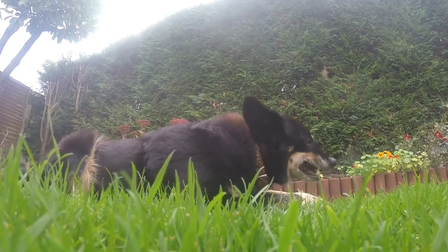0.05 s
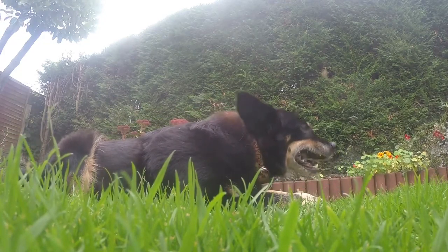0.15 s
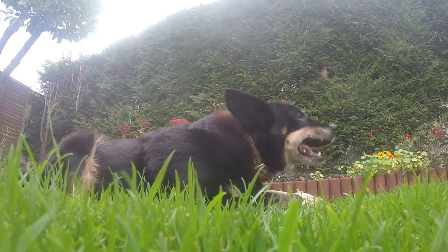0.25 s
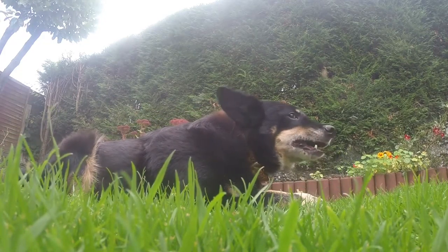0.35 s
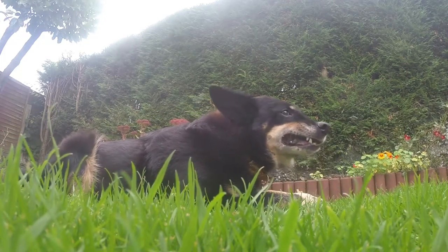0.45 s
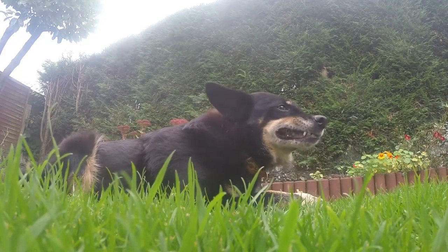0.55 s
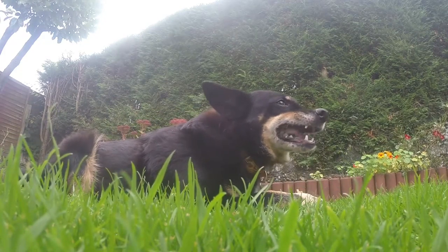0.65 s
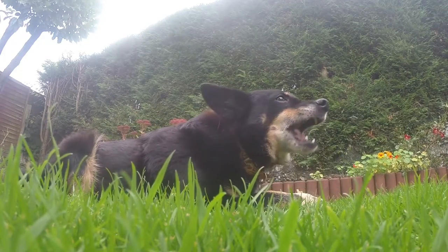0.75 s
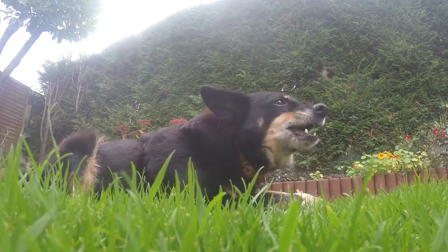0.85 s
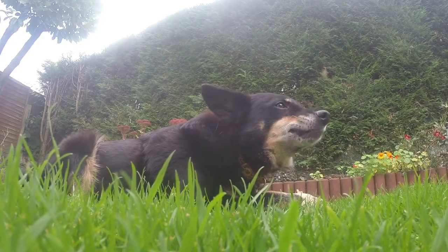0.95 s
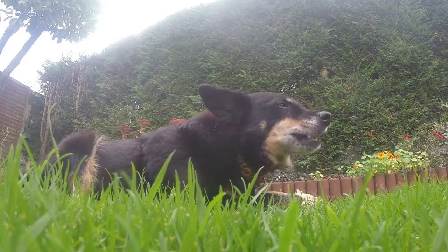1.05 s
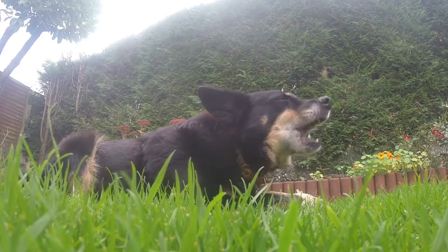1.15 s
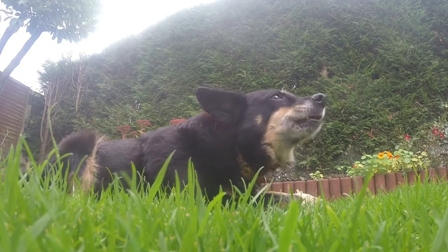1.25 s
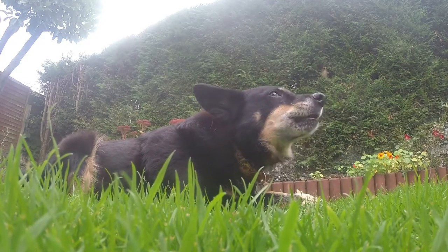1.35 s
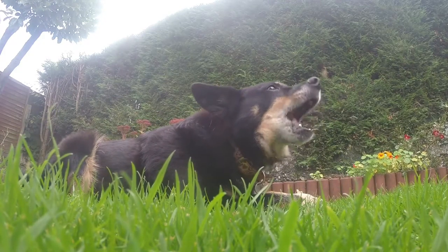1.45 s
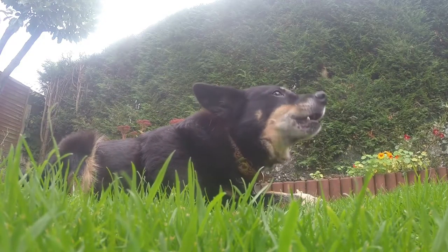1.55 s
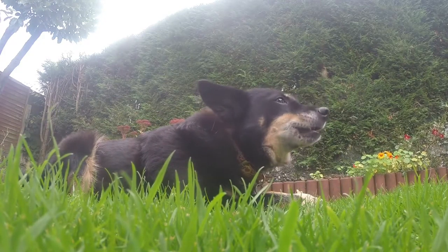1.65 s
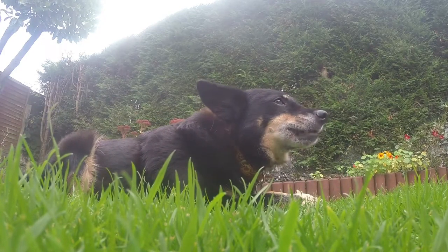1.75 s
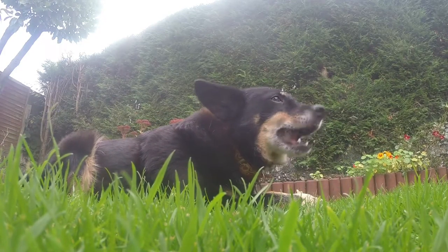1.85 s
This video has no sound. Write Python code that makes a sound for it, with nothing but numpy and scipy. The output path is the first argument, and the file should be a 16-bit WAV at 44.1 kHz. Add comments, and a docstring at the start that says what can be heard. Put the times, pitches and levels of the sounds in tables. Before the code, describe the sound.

A close, low outdoor microphone in the grass picks up a steady, soft, dark rush of garden air, with a very faint high hiss. Nothing else happens until about 2.0 seconds, when a dog bites a bone: short brittle creaks and ticks with a dull low jolt, and a firmer creak at 2.3. At 2.46 the bone snaps with a deep, short thump, and at about 2.53 it splits in a loud, dry, woody crack, the loudest moment. A low rumble from the turf swells and slowly settles. From 2.64 to 3.3 hard tooth clicks come in a quick irregular cluster over gritty gnawing. Then chewing softens, with sparse clicks around 3.65, 4.2 to 4.6, a hollower, lower, stronger one at 5.0, and 5.6. Around 6.0 to 6.15 several brighter clicks and a wet smack occur, then a last click near 6.5. Reflections are weak and short.

```python
"""Garden air rushes steadily throughout, as heard by a camera in the grass: shaped noise.
At about two seconds a dog on the lawn bites a bone: creaks made of tiny breaks, clicks of teeth that
ring briefly, gritty gnawing noise and a low rumble of the turf. The bone snaps with a dull thump, a
swinging low tone, then splits in one loud crack. Softer chewing follows, with clicks and a late smack."""
import sys
import numpy as np
from scipy import signal
from scipy.fft import rfft, irfft, next_fast_len
from scipy.io import wavfile

SR = 44100
rng = np.random.default_rng(int(sys.argv[2]) if len(sys.argv) > 2 else 0)


def digitize_waveform(pressure):
    """Quantize a signal to 16-bit integers and store it at the path in sys.argv[1].

    Rows of a 2-D input are taken as channels; values are limited to [-1, 1].
    """
    field = np.atleast_2d(pressure).T
    bounded = np.clip(field, -1, 1)
    quanta = np.round(bounded * 32767).astype(np.int16)
    wavfile.write(sys.argv[1], SR, quanta)


N = 291809  # length [samples]

# All levels in the tables are relative; the functions set the final loudness.
# teeth slipping on bone: (time before a short lag [s], ring level [dB], ring pitch [Hz], contact level [dB])
TOOTH_CLICKS = [(2.0673, -45, 2350, -64), (2.395, -40.5, 2710, -61), (2.6416, -49, 2390, -57),
                (2.6882, -43, 2670, -56), (2.7035, -41, 1570, -54.5), (2.7511, -39, 2420, -61),
                (2.7626, -42, 2670, -65), (2.805, -40, 2500, -58), (2.8171, -43, 2700, -61),
                (2.8476, -35.5, 2480, -51), (2.9347, -43, 2720, -54), (3.1063, -39, 2620, -59),
                (3.1113, -46, 2500, -55), (3.209, -46, 2540, -61.5), (3.2261, -37.5, 2640, -60),
                (3.2886, -40.5, 2420, -63), (3.651, -45, 2680, -62.5), (4.1577, -50.5, 2820, -56.5),
                (4.343, -38.5, 2560, -56), (4.4005, -45, 2400, -65), (4.5271, -41.5, 1640, -61.5),
                (4.6062, -39, 2670, -58), (4.838, -47.5, 2740, -67), (4.9968, -31, 1555, -58),
                (5.0384, -42, 2700, -60.5), (5.5765, -38, 2650, -54.5), (5.7068, -45, 2620, -65),
                (5.9807, -44.5, 2730, -55), (6.0578, -33.5, 2550, -51.5), (6.095, -47, 2380, -65),
                (6.1299, -36, 2550, -55.5), (6.473, -41, 2730, -63)]
# breaks running through the bone, the last in three stages:
# (time [s], length [s], level [dB], splinters against that level [dB],
#  pitch of the bending piece [Hz], piece against the bone's ring [dB])
BONE_CRACKS = [(2.0085, 0.0042, -41, -28, 5700, -7), (2.018, 0.0072, -44, -33, 3330, -6),
               (2.082, 0.0035, -49, -29, 3700, -2), (2.2055, 0.0031, -44.5, -32, 2500, -1),
               (2.3107, 0.011, -34, -21, 1637, -3), (2.459, 0.0011, -26, -18, 4300, -6),
               (2.51, 0.0035, -49, -24.5, 2420, -7), (2.5309, 0.0081, -23, -16, 2080, -6),
               (2.5378, 0.0075, -25.5, -10, 3230, -5), (2.543, 0.0074, -25, -18, 2730, -3)]
# thin splinters and wet smacks of the lips: (time [s], level [dB])
LIP_SMACKS = [(2.643, -49), (2.777, -48), (4.15, -51), (6.135, -39)]
# dull jolts through the ground: (time [s], level [dB], pitch [Hz], time to fall 60 dB [s])
GROUND_THUMPS = [(2.044, -35.5, 39, 0.064), (2.358, -38.5, 26, 0.23), (2.4599, -18.5, 73, 0.041),
                 (2.561, -32.5, 29.7, 0.21), (2.694, -42, 55, 0.12)]
# tones of the bone held in the jaw: (pitch [Hz], level [dB], time to fall 60 dB before damping [s])
BONE_TONES = [(1110, -15.5, 0.057), (1283, -10.5, 0.061), (1598, -9, 0.081), (1740, -1, 0.054),
              (2117, -3, 0.061), (2175, -3, 0.016), (2260, 1.5, 0.029), (2658, -0.5, 0.038),
              (3160, -3, 0.027), (3320, 2, 0.015), (4000, -17, 0.014), (5430, -13, 0.024),
              (5790, -2.5, 0.01), (6160, -51, 0.0099), (7200, -15.5, .01)]
# colour of a tooth meeting the bone: (frequency [Hz], level [dB])
CONTACT_COLOUR = [(300, -48), (900, -26), (1600, 17), (2000, -17), (2600, 14), (3600, -1.5), (4200, 5),
                  (4800, -16), (5900, -2), (8000, -15), (13000, -21), (16000, -63)]
# colour of hissing splinters: (frequency [Hz], level [dB])
SPLINTER_COLOUR = [(1000, -30), (4000, -4), (5600, 4.5), (7600, 1), (9000, -3), (11000, -14), (13000, -7),
                   (16000, -24)]
# colour of gnawing grit: (frequency [Hz], level [dB])
GRIT_COLOUR = [(400, -16), (1000, -8), (1600, -1), (2000, -2), (2600, 2.5), (3100, -8.5), (3700, -11),
               (4300, -13.5), (4900, -20.5), (5900, -14.5), (8000, -26), (15000, -37)]
# colour of the garden air: (frequency [Hz], level [dB])
AIR_COLOUR = [(10, -17), (25, 1.5), (45, -0.5), (70, -2.5), (100, -2), (140, -3.5), (250, -6.5),
              (450, -10.5), (1000, -15.5), (1700, -20), (4600, -27), (8000, -34.5), (12000, -40),
              (15000, -44)]
# colour of the turf's rumble: (frequency [Hz], level [dB])
TURF_COLOUR = [(8, -14), (25, 3.5), (60, -2.5), (120, -9), (250, -19.5), (800, -37), (3000, -100)]
# bites of the jaw: (time of reaching full force [s], hold [s], force [dB])
JAW_BITES = [(2.023, 0.055, -56.5), (2.475, 0.041, -46.5), (2.67, 0.037, -54.5), (3.083, 0.25, -62.5),
             (4.26, 0.42, -63), (5.293, 0.062, -63), (5.666, 0.024, -62.5), (6.074, 0.037, -56.5),
             (6.475, 0.026, -66.5)]
# colour of the answer from hedge, fence and border: (frequency [Hz], level [dB])
HEDGE_COLOUR = [(200, -4), (2500, -26), (6000, 6.0), (15000, 5)]

TIGHTEN_DB_PER_S, RELAX_DB_PER_S = 108, 100  # how fast the gnawing builds and fades
HOLD_DB = -69.5  # force while the bone is only held, from the first bite on
# the body on the turf: level against the bite, its rise and its fall
BRACE_DB, BRACE_DB_PER_S, SETTLE_DB_PER_S = -4.5, 29, 7.5
TOP_HZ = 15300  # the camera's band limit


def amp(db):
    """Turn decibels into gain."""
    return 10 ** (np.asarray(db) / 20)


def unit(x):
    """Scale to an rms (average strength) of 1."""
    return x / np.sqrt(np.mean(x ** 2) + 1e-20)


def filtered(x, response):
    """Multiply each frequency of x by the gain that response gives for it."""
    size = next_fast_len(len(x) + 8192)
    spectrum = rfft(x, size) * response(np.fft.rfftfreq(size, 1 / SR))
    return irfft(spectrum, size)[:len(x)]


def coloured(x, points):
    """Shape x by a colour table, at rms 1."""
    f, db = np.transpose(points)

    def response(hz):
        return amp(np.interp(np.log(hz + 1), np.log(f + 1), db))

    return unit(filtered(x, response))


def noise(points, size):
    """Noise shaped by a colour table, at rms 1."""
    return coloured(rng.standard_normal(size), points)


def fade(t, t60):
    """Die away smoothly, 60 dB down after t60 seconds."""
    return np.exp(-np.log(1000) * t / t60)


def add(track, s, sound):
    """Mix a sound into the track at time s."""
    part = track[round(s * SR):][:len(sound)]
    part += sound[:len(part)]


def effort(rise_db_per_s, fall_db_per_s):
    """The force of the jaw in dB: every bite rises, holds and falls at the same rates."""
    t = np.arange(N) / SR
    bites = []
    for s, hold, db in JAW_BITES:
        rise = rise_db_per_s * np.maximum(s - t, 0)
        fall = fall_db_per_s * np.maximum(t - s - hold, 0)
        bites.append(db - rise - fall)
    first_bite = JAW_BITES[0][0]
    held = HOLD_DB - rise_db_per_s * np.maximum(first_bite - t, 0)
    return np.max(bites + [held], axis=0)


def garden(air_db=-56):
    """Steady outdoor air, with a low rumble as the dog braces for each bite and slowly settles."""
    air = amp(air_db) * noise(AIR_COLOUR, N)
    brace = amp(BRACE_DB + effort(BRACE_DB_PER_S, SETTLE_DB_PER_S))
    return air + brace * noise(TURF_COLOUR, N)


def hedge(x, t60=0.094, wet_db=-23):
    """Hedge, fence and border scatter a weak, short answer."""
    t = np.arange(SR // 2) / SR
    tail = noise(HEDGE_COLOUR, len(t)) * fade(t, t60)
    tail *= t > 0.005  # nothing returns in the first 5 ms
    return amp(wet_db) * signal.fftconvolve(x, tail / np.linalg.norm(tail))[:N]


def thumps(rise=0.00015, lead=0.43):
    """Each jolt through the ground is a sudden push that swings back and dies away."""
    out, t = np.zeros(N), np.arange(SR // 4) / SR
    for s, db, hz, t60 in GROUND_THUMPS:
        swing = np.sin(2 * np.pi * hz * t + lead)
        onset = 1 - np.exp(-t / rise)
        add(out, s, -amp(db) * fade(t, t60) * swing * onset)
    return out


def gnawing(grains_hz=260, scatter_db=5.0, grit_db=-1, rub_db=-7):
    """Crumbs break between the teeth over a fine rubbing; both follow the bite."""
    sizes = amp(scatter_db * np.minimum(rng.exponential(size=N), 2))
    grains = (rng.random(N) < grains_hz / SR) * sizes
    t = np.arange(SR // 100) / SR
    crumb_power = signal.fftconvolve(grains ** 2, fade(t, 0.0071))[:N]
    crumbs = np.sqrt(np.abs(crumb_power)) * rng.standard_normal(N)
    grit = amp(grit_db) * coloured(crumbs, GRIT_COLOUR)
    rub = amp(rub_db) * noise(GRIT_COLOUR, N)
    return amp(effort(TIGHTEN_DB_PER_S, RELAX_DB_PER_S)) * (grit + rub)


def smacks(t60=0.011, rise=0.00053):
    """Splinters and lips make short bright ticks of noise with no ring."""
    out, t = np.zeros(N), np.arange(SR // 30) / SR
    for s, db in LIP_SMACKS:
        onset = 1 - np.exp(-t / rise)
        add(out, s, amp(db - 2) * noise(SPLINTER_COLOUR, len(t)) * fade(t, t60) * onset)
    return out


def bone_ring(t, damping):
    """The bone's answer to one blow, at unit energy; lips and gums damp it."""
    ring = np.zeros(len(t))
    for hz, db, t60 in BONE_TONES:
        level = amp(db + rng.normal(0, 0.44))  # each blow differs a little
        tone = np.sin(2 * np.pi * (hz * t + rng.random()))
        ring += level * fade(t, t60 / damping) * tone
    return ring / np.linalg.norm(ring)


def clicks(ring_t60=0.0095, contact_t60=0.0058, rise=0.00055, ring_db=4, contact_db=21, bone_db=4, lag=0.0004):
    """A tooth slips: a hard contact, a few cycles of the mouth cavity and a faint ring of the bone."""
    out, t = np.zeros(N), np.arange(SR // 20) / SR
    onset = 1 - np.exp(-t / rise)
    for s, db, hz, treble_db in TOOTH_CLICKS:
        cavity = amp(db + ring_db) * fade(t, ring_t60) * np.sin(2 * np.pi * hz * t)
        contact = amp(treble_db + contact_db) * fade(t, contact_t60) * noise(CONTACT_COLOUR, len(t))
        ring = amp(db + bone_db) * bone_ring(t, damping=0.81)
        add(out, s + lag, onset * (cavity + contact + ring))
    return out


def cracks(breaks_hz=3200, splinter_t60=0.017, piece_t60=0.018, first=1.8, tear_db=-8, low_hz=1000):
    """A fast, uneven run of tiny breaks rings the bone and the bending piece, and splinters hiss."""
    out, t = np.zeros(N), np.arange(SR // 12) / SR
    for s, length, db, splinter_db, hz, piece_db in BONE_CRACKS:
        breaks = (rng.random(len(t)) < breaks_hz / SR) * rng.standard_normal(len(t)) * (t < length)
        breaks[0] = first  # the first break starts the run abruptly
        piece_ring = fade(t, piece_t60) * np.sin(2 * np.pi * hz * t)
        whole = unit(signal.fftconvolve(breaks, bone_ring(t, damping=1.12))[:len(t)])
        piece = unit(signal.fftconvolve(breaks, piece_ring)[:len(t)])
        run = fade(np.maximum(t - length, 0), splinter_t60)
        tear = unit(noise(GRIT_COLOUR, len(t)) * run)  # the rough faces scrape as they part
        body = unit(whole + amp(piece_db) * piece + amp(tear_db) * tear)
        body *= np.sqrt(length / t[-1])  # a longer crack carries more energy
        splinters = amp(splinter_db) * noise(SPLINTER_COLOUR, len(t)) * run
        add(out, s, amp(db) * (body + splinters))
    # so small a bone radiates little bass
    highpass = signal.butter(2, low_hz, "highpass", fs=SR, output="sos")
    return signal.sosfilt(highpass, out)


def scene():
    """The chewing dog in the garden."""
    mouth = gnawing() + smacks() + clicks() + cracks()
    return (garden() + hedge(mouth) + thumps() + mouth)[None]


def record(dry, whine_hz=10070, width_hz=130, whine_db=-87):
    """The camera adds a faint narrow hiss and cuts steeply above its band limit."""
    def narrow(hz):
        return 1 / (1 + ((hz - whine_hz) / width_hz) ** 2)

    def band_limit(hz):
        return 1 / (1 + (hz / TOP_HZ) ** 160)

    whine = unit(filtered(rng.standard_normal(N), narrow))
    return filtered(dry[0] + amp(whine_db) * whine, band_limit)[None]


dry = scene()
out = record(dry)
digitize_waveform(out)
```